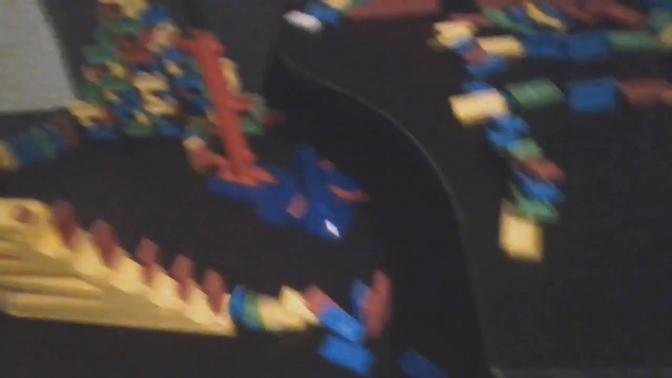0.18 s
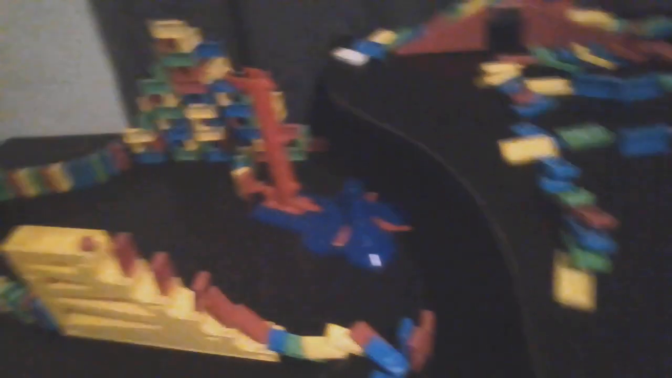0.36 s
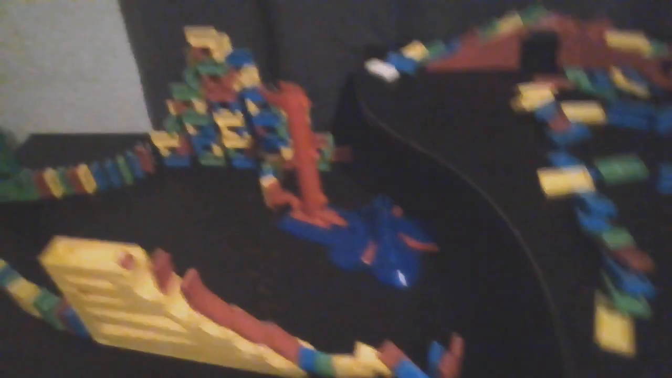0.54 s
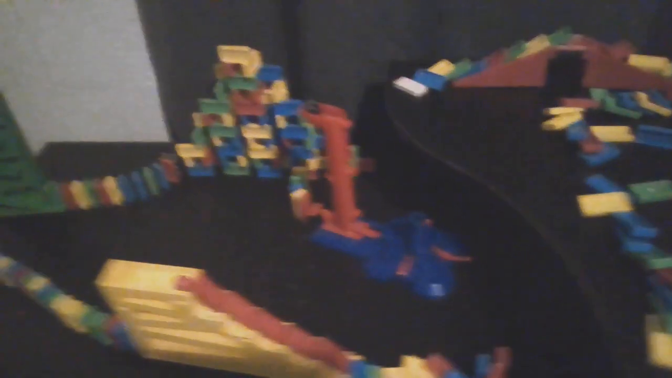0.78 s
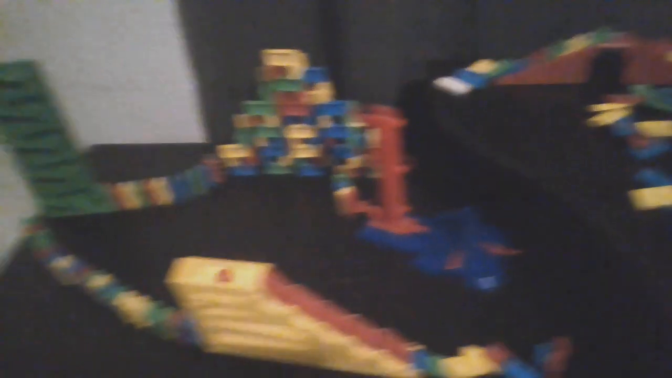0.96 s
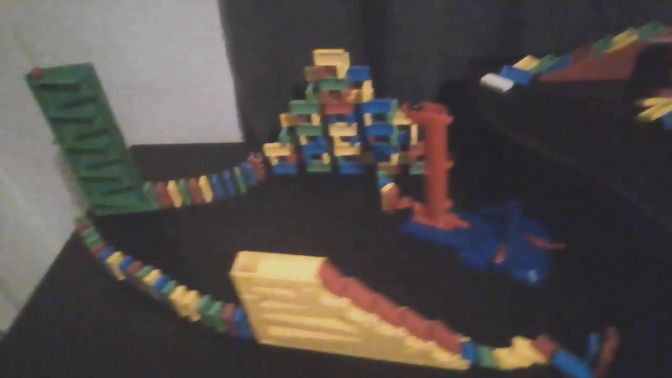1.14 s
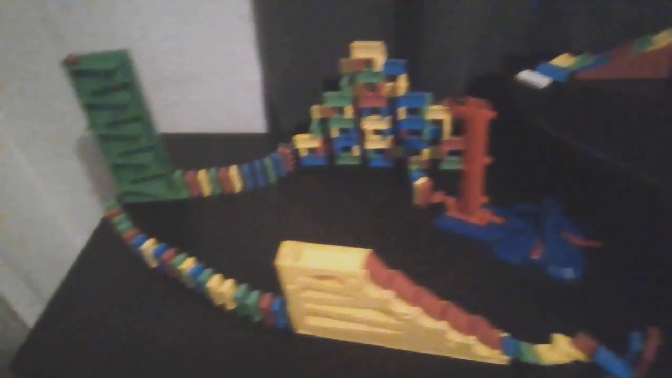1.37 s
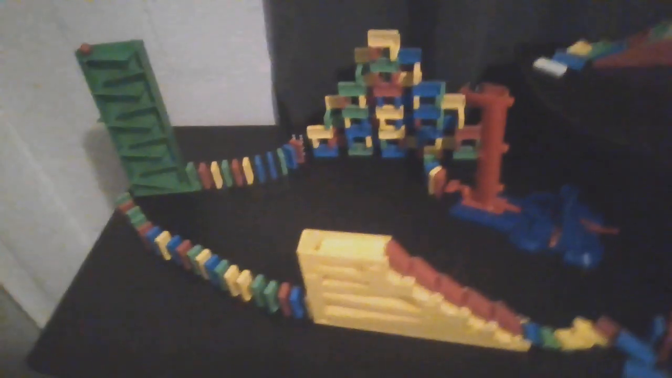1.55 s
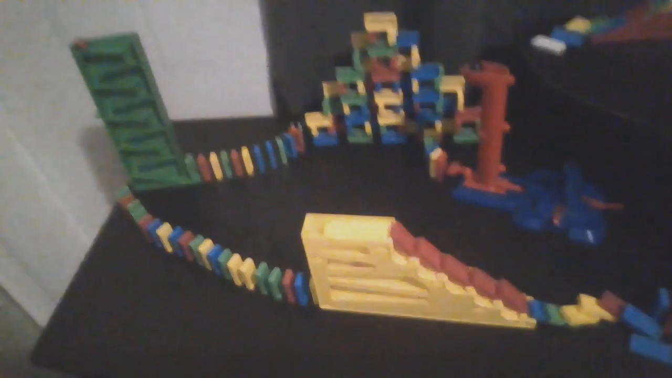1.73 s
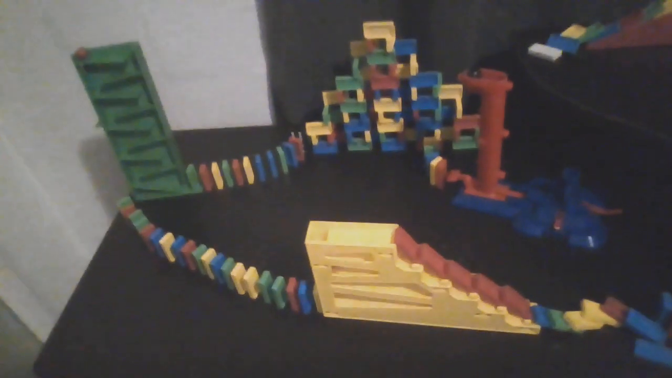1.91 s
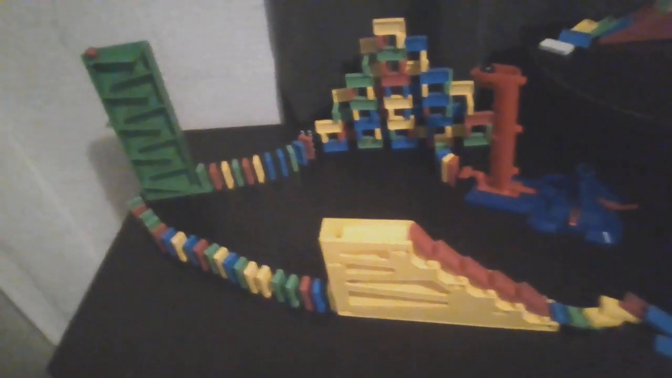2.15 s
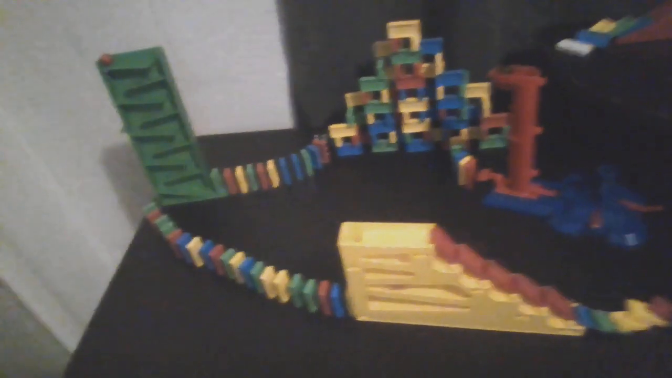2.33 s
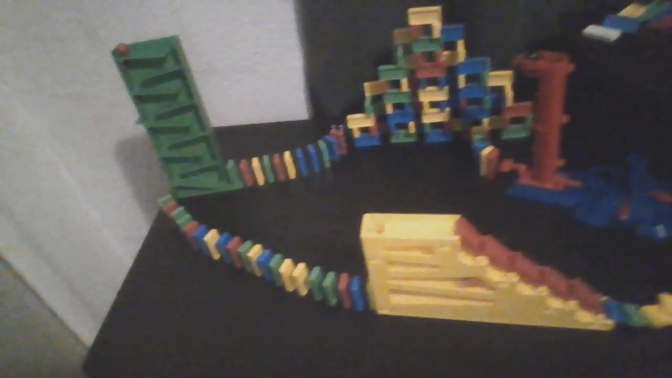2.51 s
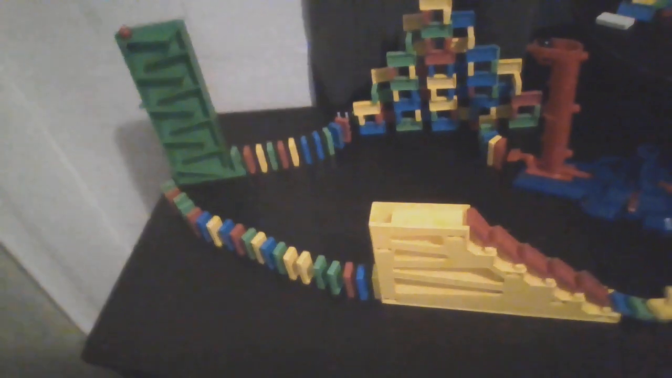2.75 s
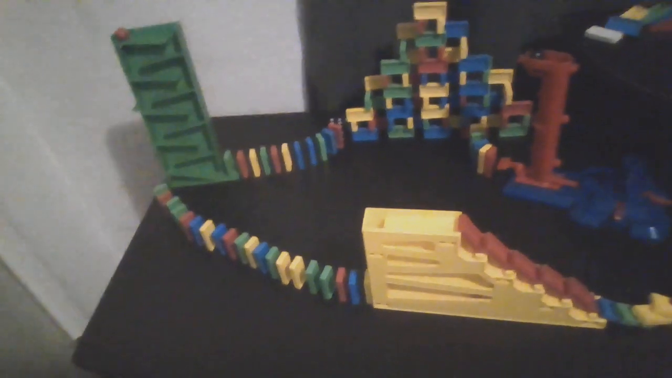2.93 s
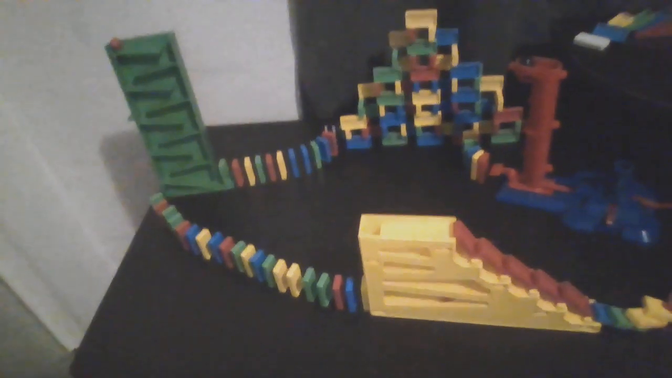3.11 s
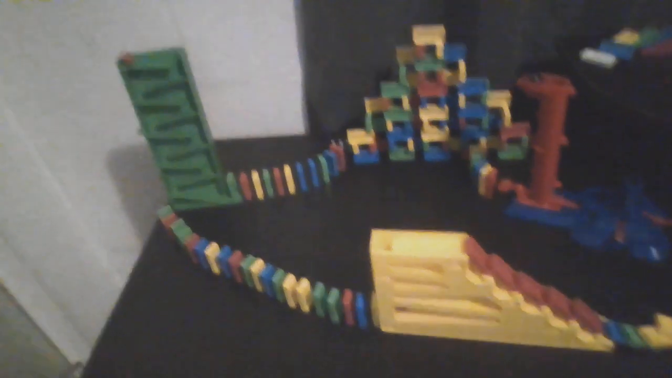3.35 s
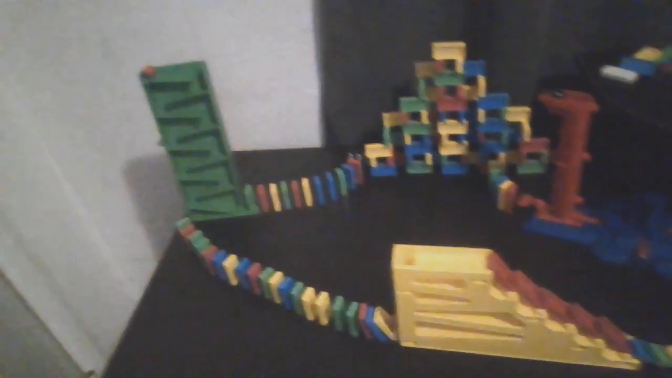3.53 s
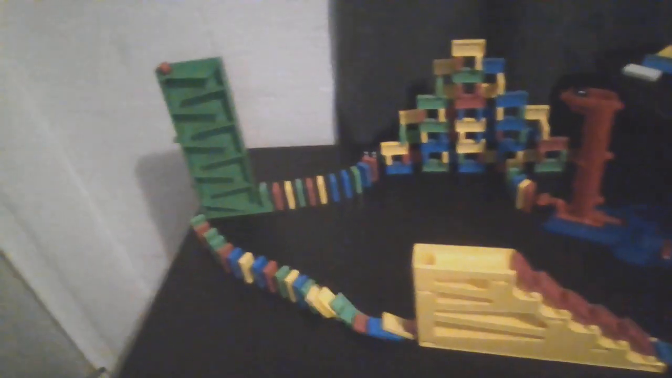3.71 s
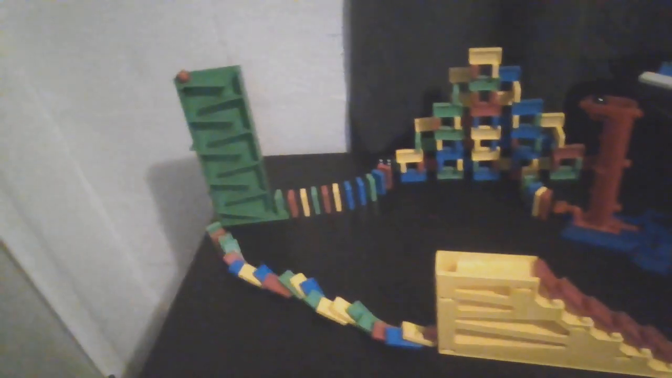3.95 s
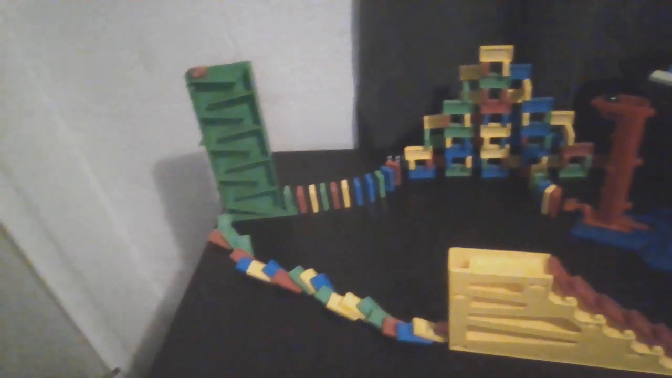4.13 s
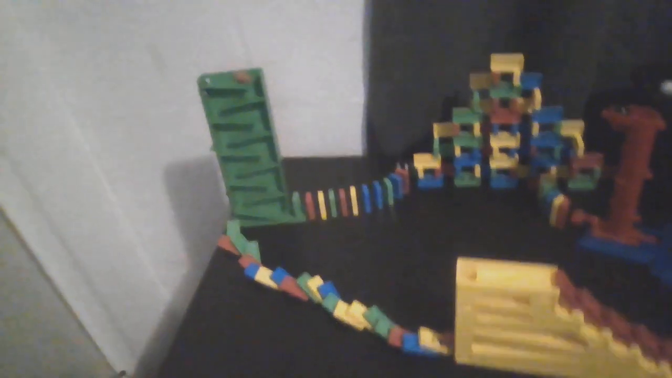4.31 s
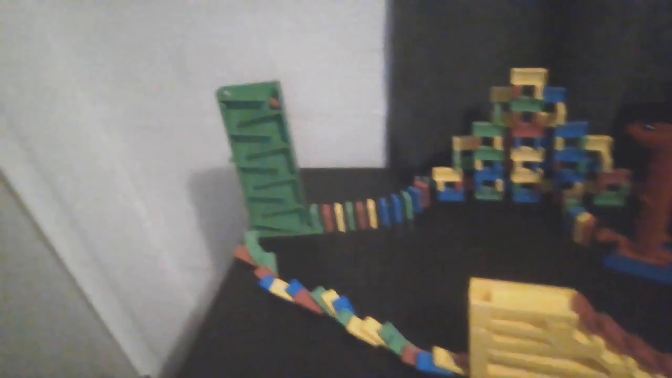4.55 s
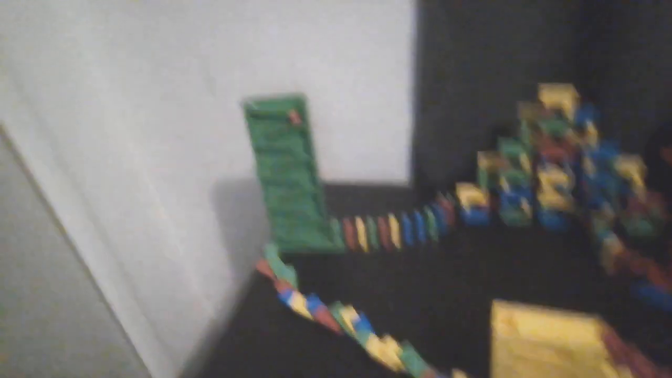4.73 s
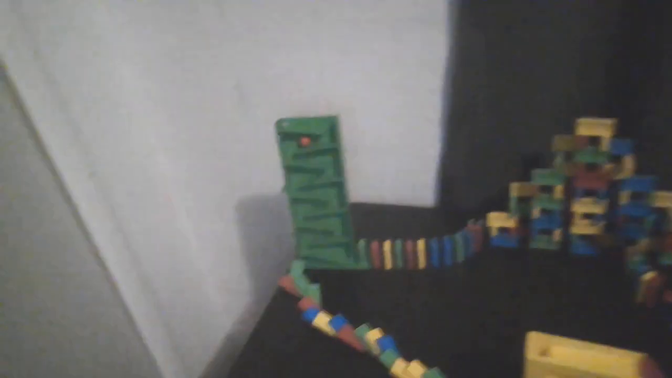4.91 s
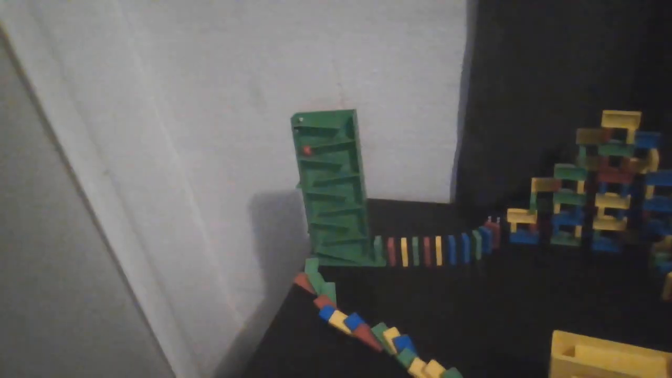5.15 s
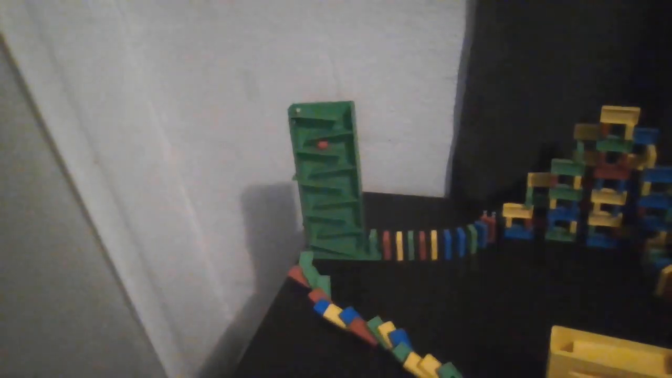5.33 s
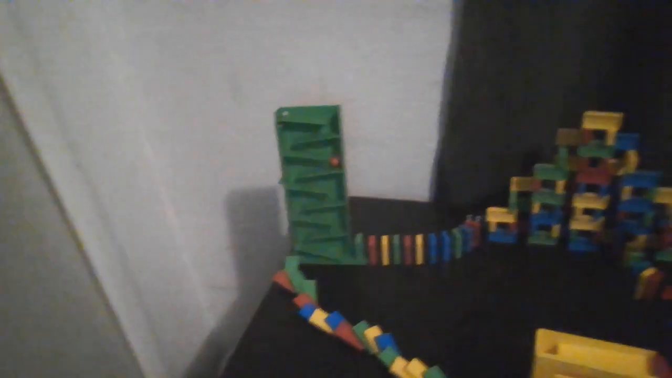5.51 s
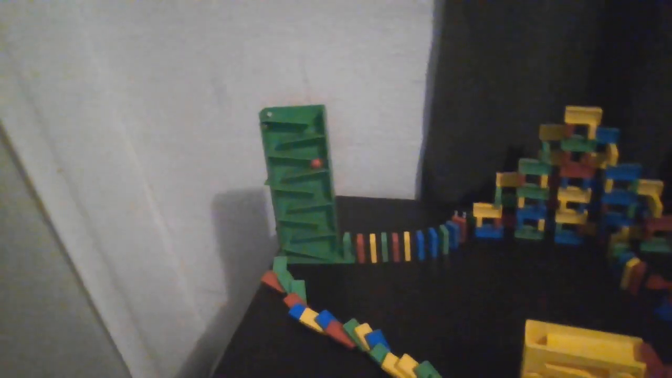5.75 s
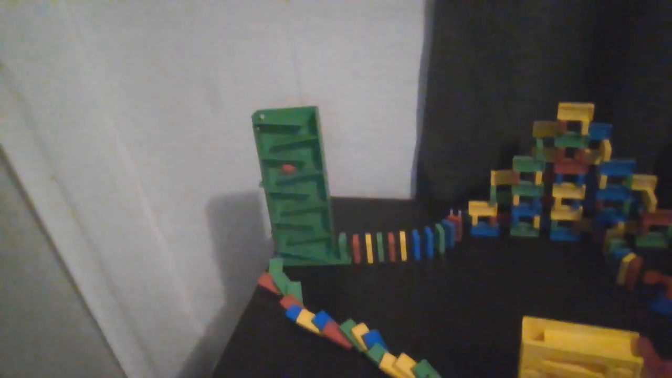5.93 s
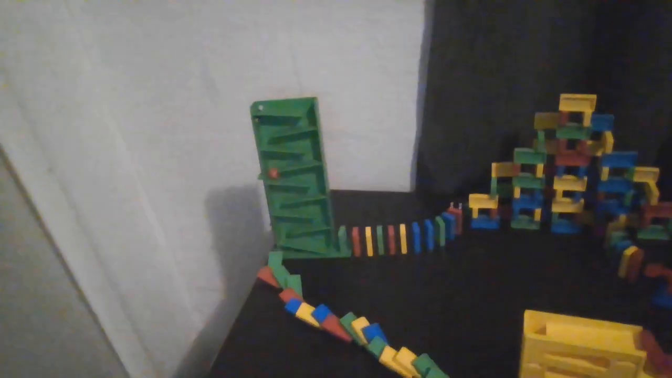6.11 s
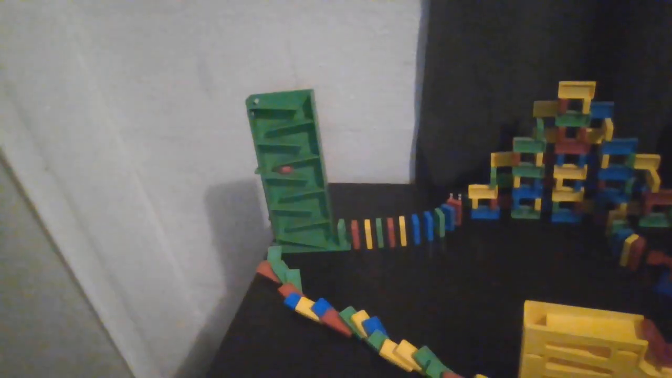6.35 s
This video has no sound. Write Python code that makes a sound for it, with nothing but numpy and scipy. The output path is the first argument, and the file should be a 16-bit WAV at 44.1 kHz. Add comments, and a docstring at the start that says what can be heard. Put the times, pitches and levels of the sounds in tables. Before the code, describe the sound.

Plastic dominoes clatter down in quick runs while a marble rolls and bounces down a hollow plastic staircase, then a tower, with low handling bumps.

```python
"""Plastic dominoes topple in two rattling chains; a marble rolls and drops, bouncing, through a hollow plastic
staircase and later down the ramps of a plastic tower, while the hand-held camera rumbles and thuds.
Tiles are short bending modes over a noisy clack; blows of the marble ring the modes of the hollow bodies.
Rolling is random grit driving those modes; thuds are pressure dips with a low shell ring, over deep noise.
A short room of feedback delays and steady hiss complete the scene."""
import sys
import numpy as np
from scipy import signal
from scipy.fft import rfft, irfft, next_fast_len
from scipy.io import wavfile

SR = 44100
rng = np.random.default_rng(int(sys.argv[2]) if len(sys.argv) > 2 else 0)


def store_wav(level_fs):
    """Save 16-bit WAV to argv[1]."""
    pcm = np.round(np.clip(np.atleast_2d(level_fs), -1, 1) * 32767)
    wavfile.write(sys.argv[1], SR, pcm.T.astype(np.int16))


def nominal_scale(level):
    """Amplitude ratio for a level in decibels (scalar or array-like)."""
    x = np.asarray(level, float) / 20
    return 10 ** x


N = 285768
TOWER_FROM_S = 4.1   # marble sounds from here on belong to the tower

# tiles toppling one by one onto the hollow staircase:
# (time [s], level [dB], nominal first mode [Hz], nominal clack level [dB])
STEP_TILES = [(0.2331, -7, 5050, -12), (0.2866, -14, 5140, -21.5), (0.406, -20, 5140, -21),
              (0.5363, -7.5, 5110, -15.5), (0.6537, -8.5, 5150, -14.5), (0.7735, -10.5, 5280, -19),
              (0.826, -22, 5130, -20)]
# the marble rolls, gathering speed up to an edge:
# (start [s], edge [s], start level [dB], edge level [dB], frequency favoured at speed [Hz])
ROLLS = [(0.942, 1.143, -41, -38, 2276), (1.362, 1.533, -51.5, -42, 2920), (1.737, 1.964, -61, -45, 2900),
         (2.24, 2.642, -50.5, -40, 3490), (2.95, 3.447, -59.5, -35, 2330), (4.235, 4.369, -35, -43, 2230),
         (4.749, 5.013, -59, -46.5, 2450), (5.24, 5.49, -51, -47.5, 2450), (5.73, 6.038, -59, -46.5, 1551),
         (6.284, 6.484, -61, -43, 2400)]
# spectrum of the rolling contact, mostly low; staircase, then tower: (frequency [Hz], level [dB])
ROLL_COLOUR = [
    [(400, -4), (1500, -2), (3500, -1.5), (5000, -12.5), (7000, -36.5)],
    [(400, -1.5), (1500, 6), (2600, 0), (5000, -14), (7000, -36.5)],
]
# what slow rolling favours: (staircase [Hz], tower [Hz])
SLOW_ROLL_HZ = (1380, 1180)


def rms_one(x):
    """Scales to rms 1."""
    return x / np.sqrt(np.mean(x ** 2) + 1e-20)


def level(rows):
    """A (time [s], level [dB]) curve as gain per sample, practically silent outside its span."""
    s, db = np.transpose(rows)[:2]
    return nominal_scale(np.interp(np.arange(N) / SR, s, db, left=-120, right=-120))


def colour(x, points):
    """Filters x by the gain curve of (frequency [Hz], level [dB]) points."""
    hz = np.maximum(np.arange(len(x) // 2 + 1) * SR / len(x), 1)
    curve_hz, curve_db = np.transpose(points)
    gain_db = np.interp(np.log(hz), np.log(curve_hz), curve_db, left=-90)
    return irfft(rfft(x) * nominal_scale(gain_db), len(x))


def ring(clicks, hz, t60):
    """A resonator: a unit click sets a decaying sine of height 1 ringing."""
    r = nominal_scale(-60 / (t60 * SR))
    w = 2 * np.pi * hz / SR
    return signal.lfilter([0, np.sin(w)], [1, -2 * r * np.cos(w), r * r], clicks + 1e-18)


def grains(per_s, spread_db):
    """Tiny contacts: random clicks of uneven size and sign."""
    sizes = nominal_scale(spread_db * np.minimum(rng.exponential(1, N), 4)) * rng.choice([-1, 1], N)
    return sizes * (rng.random(N) < per_s / SR)


def drift(hz):
    """Slow random wandering of rms 1: noise through a two-pole lowpass."""
    r = np.exp(-2 * np.pi * hz / SR)
    return rms_one(signal.lfilter([1], [1, -2 * r, r * r], rng.standard_normal(N)))


def add(out, s, sound):
    """Mixes a sound in at time s."""
    i = round(s * SR)
    out[i:i + len(sound)] += sound[:N - i]


def burst(spectrum, t60, tilt_db, seeds):
    """The countless unresolved modes of a blow: noise that dies away, the treble first."""
    t = np.arange(len(seeds)) / SR
    tilted = [(hz, db + tilt_db * np.log2(hz / 3000)) for hz, db in spectrum]
    # chatter: the contact breaks and remakes
    chatter = nominal_scale(1.35 * rms_one(signal.lfilter([1], [1, -.99], seeds[::-1])))
    shaped = rms_one(colour(seeds, tilted)) * chatter
    low = signal.lfilter([.35], [1, -.65], shaped)
    treble = shaped - low
    return (low * nominal_scale(-60 * t / t60) + treble * nominal_scale(-60 * t / (0.49 * t60))) / 2


def tiles():
    """Every tile rings its own slightly scaled bending modes over a clack; sliding chains rattle and scuff."""
    # tile on tile, the blows that stand out of the rattle: (time [s], level [dB])
    tile_hits = [(0.0004, -5), (0.0134, -6), (0.0514, 0.5), (0.0598, -1.5), (0.0734, -1), (0.1011, -16),
                 (0.1224, -10), (0.162, -8.5), (0.1849, -15), (0.647, -30), (3.4715, -14.5),
                 (3.5004, -14.5), (3.5508, -26.5), (3.5934, -15), (3.6072, -11.5), (3.6469, -9.5),
                 (3.6697, -8.5), (3.6885, -3), (3.712, -4.5), (3.7334, -1), (3.7594, -3.5), (3.778, -8.5),
                 (3.8037, -2), (3.8322, -8), (3.8544, -10), (3.8791, -7.5), (3.904, -0.5), (3.9504, -6),
                 (3.9717, -2), (3.9894, -1.5), (4.006, -3.5), (4.0455, -2.5), (4.0844, -2.5)]
    # small slips and taps, one curve for each running chain: (time [s], level [dB])
    rattle_runs = [
        [(0.0, -21), (0.11, -49), (0.3, -33)],
        [(3.585, -33.5), (3.915, -14.5), (4.2, -37)],
    ]
    # a tile's bending modes: (multiple of first mode, level [dB], t60 [s])
    tile_modes = [(1.001, 3.5, 0.038), (1.041, -13, 0.13), (1.499, -13.5, 0.057), (1.585, -18, 0.045),
                  (2.089, -5.5, 0.022), (2.152, -27.5, 0.021), (3.081, -20.5, .03)]
    # spectrum of the broad clack of tile on table: (frequency [Hz], level [dB])
    clack_spectrum = [(300, -5), (700, -2), (1300, -2), (3300, 2), (6000, -1), (9000, -19.5),
                      (13000, -15.5), (16000, -12.5)]
    out, t = np.zeros(N), np.arange(6000) / SR
    # chain tiles fall from the same height, so the clack on the table hardly follows the blow
    chain = [(s, db, 4996, -15.5 + 0.38 * db) for s, db in tile_hits]
    hits = chain + STEP_TILES
    chance = rng.standard_normal((len(hits), 6000))
    for (s, db, hz, clack_db), seeds in zip(hits, chance):
        clack_db = clack_db + 1 * seeds[-2]   # spread 1 dB
        hz = hz * (1 + .009 * seeds[-1])
        rings = sum(nominal_scale(mode_db + 1.5 * seeds[k] - 60 * t / t60) * np.sin(2 * np.pi * hz * ratio * t)
                    for k, (ratio, mode_db, t60) in enumerate(tile_modes))
        swell = 1 - np.exp(-t / 0.00057)   # faces slap together over a millisecond or so
        crack = np.diff(seeds, prepend=0) * nominal_scale(-60 * t / 0.0035)   # edges meet first
        clack = nominal_scale(clack_db) * burst(clack_spectrum, 0.15, 0, seeds)
        add(out, s, nominal_scale(db - 4.0) * rings * swell + clack + nominal_scale(db - 15.0) * crack)
    taps = grains(1500, spread_db=4.0)
    tapped_tile = rng.integers(0, 6, N)   # each tap falls on one of six tile pitches
    rattle = sum(nominal_scale(mode_db) * ring(taps * (tapped_tile == k), hz * ratio, t60)
                 for k, hz in enumerate(np.linspace(4850, 5250, num=6))
                 for ratio, mode_db, t60 in tile_modes)
    scuff = colour(grains(1500, spread_db=6.0), clack_spectrum)
    running = sum(level(run) for run in rattle_runs)
    return out + running * (rms_one(rattle) + nominal_scale(-12.5) * rms_one(scuff))


def handling():
    """Each thud is a short pressure dip that leaves the camera shell ringing low; the sway is lumpy deep noise."""
    # fingers shifting on the camera body: (start [s], level [dB])
    thuds = [(0.346, -16.5), (0.445, -18), (0.72, -30), (0.945, -38), (1.083, -26), (1.283, -26.5),
             (1.518, -24), (1.718, -25.5), (1.869, -27.5), (1.912, -25), (2.318, -24.5), (2.414, -25),
             (2.471, -25), (2.637, -22.5), (2.793, -25.5), (3.244, -19.5), (3.544, -16), (4.154, -21),
             (4.263, -24), (4.676, -29.5), (4.79, -24.5), (4.82, -24.5), (4.895, -21), (4.949, -28.5),
             (5.166, -27), (5.311, -23.5), (5.338, -22.5), (5.415, -21), (5.821, -27)]
    # the hand's slow sway on the camera: (time [s], level [dB])
    sway_curve = [(0.0, -36), (0.49, -19.5), (2.27, -34.5), (2.33, -29), (2.89, -33), (3.59, -28),
                  (3.86, -34), (4.96, -31.5), (5.07, -34), (5.31, -24.5), (6.35, -39), (6.48, -38.5)]
    # spectrum of the sway: (frequency [Hz], level [dB])
    sway_spectrum = [(15, 20), (30, -12), (60, -5), (120, -18), (250, -19), (500, -42), (1000, -67.5)]
    out, t = np.zeros(N), np.arange(3000) / SR
    since = t - .008   # the dip is deepest 8 ms after the start
    chance = rng.uniform(-1.24, 1, (len(thuds), 2))
    for (s, db), (size, shell) in zip(thuds, chance):
        dip = np.exp(-(since / (0.0013 * 2 ** (0.42 * size))) ** 2)
        hz = 220 * 2 ** (0.45 * shell)
        wobble = np.sin(2 * np.pi * hz * (since - .001)) * nominal_scale(-60 * since / 0.059) * (since > .001)
        creak = np.sin(2 * np.pi * 1.845 * hz * since) * np.exp(-(since / 0.0057) ** 2)
        add(out, s, nominal_scale(db + 5.5) * (0.33 * wobble + 0.11 * creak - dip))
    slow_noise = signal.lfilter([1], [1, -np.exp(-2 * np.pi * 6.3 / SR)], rng.standard_normal(N))
    lumps = nominal_scale(4.43 * rms_one(slow_noise))
    deep_noise = colour(rng.standard_normal(N), sway_spectrum)
    return out + level(sway_curve) * rms_one(lumps * deep_noise)


def hiss():
    """The microphone's steady white noise."""
    return nominal_scale(-60.5) * rng.standard_normal(N)


def blows(start_s, end_s, bounce, count):
    """Knocks, landings and each landing's shrinking hops within a time span, for one body."""
    # the marble knocks once against a wall or seam:
    # (time [s], level [dB], frequency the struck spot favours [Hz], relative level of hollow low modes [dB])
    knocks = [(1.1653, 1, 3390, -1), (1.1754, 2, 2050, -23.5), (1.5834, 3.5, 3605, 1),
              (1.77, -36.5, 2880, 1), (1.8493, -23.5, 2900, -5.5), (1.9897, 1, 5050, -11.5),
              (2.37, -29, 3420, -8), (2.415, -21, 2890, -24), (2.475, -24.5, 2880, -32.5),
              (2.6759, 7, 3450, 2), (3.2176, -23, 3350, -1), (3.042, -34, 2460, 0),
              (3.108, -29, 3490, -5.5), (4.138, -5.5, 2200, -19), (4.1649, -10, 2200, -11),
              (4.4015, 4.5, 3600, 0), (5.0478, -3.5, 2200, -12), (4.995, -32.5, 2450, -5.5),
              (5.385, -30, 2450, -16.5), (5.472, -17.5, 2460, -8), (5.5186, -0.5, 2400, -7),
              (6.0665, 0.5, 2467, -8.5), (6.435, -21, 2410, -6)]
    # the marble lands on the next step or ramp and bounces:
    # (time [s], level [dB], favoured frequency [Hz], relative hollow level [dB], first hop [s])
    landings = [(1.1972, 5.5, 3490, -33, 0.052), (1.6084, 3, 2920, 3, 0.028),
                (2.0153, 5, 2832, -3.5, 0.046), (2.7121, 5, 2380, -13.5, 0.039),
                (4.431, 3, 2400, -16.5, 0.037), (5.0705, 5.5, 2410, -13.5, 0.039),
                (5.5434, 6.5, 3960, -19.5, 0.038), (6.0907, 5.5, 2520, -20, 0.034)]
    second, share, rebound_db, hop_db, hollow_db = bounce
    rows = list(knocks) + [row[:4] for row in landings]
    for s, db, hz, _, hop_s in landings:
        for k in range(count):
            hop_share = second * share ** (k - 1) if k else 1
            s = s + hop_s * hop_share
            rows.append((s, db - rebound_db - hop_db * k, hz, hollow_db))
    return [row for row in rows if start_s <= row[0] < end_s]


def strike_body(hits, modes, tick_db, hard_db):
    """Blows on a hollow body ring the modes near the struck spot most, hard ones more brightly."""
    # spectrum of the broad tick of glass on plastic, before its tilt: (frequency [Hz], level [dB])
    tick_spectrum = [(300, 4), (700, -13.5), (1500, 3.5), (3500, 1.5), (6000, -4.5), (8000, -16.5),
                     (12000, -13), (16000, -28)]
    out, t = np.zeros(N), np.arange(9000) / SR
    hz, mode_db, t60 = np.transpose(modes)[:, :, None]
    # uneven walls split each mode into a beating pair
    twin_hz = hz * (1 + 0.013 * rng.uniform(0.19, 1.5, hz.shape))
    pairs = np.sin(2 * np.pi * hz * t) + 0.32 * np.sin(2 * np.pi * twin_hz * t)
    decays = nominal_scale(-60 * t / t60) * pairs
    chance = rng.standard_normal((len(hits), 9000))
    for (s, db, spot_hz, hollow_db), seeds in zip(hits, chance):
        tilt_db = hard_db + 0.21 * db   # per octave: soft contacts last longer, so sound duller
        near_db = 12 * np.exp(-(np.log2(hz / spot_hz) / .06) ** 2)
        scatter_db = 3 * seeds[:len(hz), None]
        gains = nominal_scale(mode_db + near_db + tilt_db * np.log2(hz / 3000) + scatter_db)
        gains = gains * np.sign(seeds[-len(hz):, None]) / np.sqrt(np.sum(gains ** 2))
        gains = gains * nominal_scale((hollow_db + 12) * (hz < 1800) * (hz > 900))   # hollow low modes
        tick = nominal_scale(db + tick_db) * burst(tick_spectrum, 0.093, tilt_db, seeds)
        add(out, s, nominal_scale(db - 9.5) * np.sum(gains * decays, axis=0) + tick)
    return out


def rolling(rows, modes, roll_colour, slow_hz):
    """Surface bumps tickle every mode; the favoured one moves from a low mode to the panel's own with speed."""
    # the rolling marble grinds over a ridge: (time [s], level change [dB])
    ridge_rows = [(1.08, 6), (1.529, 7.5), (1.938, 14.5), (2.39, -2.5), (2.515, 12), (2.588, 10.5),
                  (3.06, 5), (3.12, 11), (3.23, 6), (3.314, 14.5), (3.42, 1.5), (4.36, 7), (4.88, 4),
                  (5.005, 7), (5.39, 3), (5.92, 8), (6.023, 6.5), (6.45, 5.5)]
    fade_s = 0.017   # contact is made, and lost at the edge
    lumps_hz = 20
    t = np.arange(N) / SR
    grit = grains(1500, spread_db=4.0)
    lumps = nominal_scale(3.5 * drift(lumps_hz))   # uneven floor, spread 3.5 dB
    gain, speed, spot_hz = np.zeros(N), np.zeros(N), np.full(N, 1.0 * slow_hz)
    for start, edge, start_db, edge_db, hz in rows:
        here = (t >= start - fade_s) & (t < edge + fade_s)
        speed[here] = np.clip((t[here] - start) / (edge - start), 0, 1)
        spot_hz[here] = hz
        inside_s = np.minimum(t[here] - start, edge - t[here])
        contact = np.clip(inside_s / fade_s + 1, 0, 1) ** 2
        gain[here] = contact * nominal_scale(start_db + (edge_db - start_db) * speed[here])
    ridges = nominal_scale(sum(db * np.exp(-((t - s) / 0.012) ** 2) for s, db in ridge_rows))
    bumps = gain * lumps * ridges * rms_one(colour(grit, roll_colour))
    body = 0
    for hz, db, t60 in modes:
        slow, fast = (nominal_scale(9.65 * np.exp(-(np.log2(hz / f) / 0.028) ** 2)) for f in (slow_hz, spot_hz))
        favour = slow + (fast - slow) * speed
        dull_db = -6.5 * (1 - speed) * np.log2(hz / slow_hz)   # 6.5 dB per octave at a standstill
        # each mode swells and fades on its own as the marble moves on
        shift_db = 4.5 * drift(lumps_hz / 2)
        drive = bumps * favour * nominal_scale(dull_db + shift_db)
        # the marble's contact evens out the modes and damps them
        body = body + nominal_scale(0.4 * db) * ring(drive, hz, 0.42 * t60) / np.sqrt(t60)
    return nominal_scale(-46.5) * body


def staircase():
    """The hollow staircase answers falling tiles, then rings under the marble's blows and rolling."""
    # modes of the staircase when struck: (frequency [Hz], level [dB], t60 [s])
    stair_modes = [(588, -15, 0.11), (1034, -26, 0.22), (1404, -13.5, 0.047), (1653, -19.5, 0.072),
                   (2048, -13, 0.066), (2306, -7, 0.081), (2460, -12, 0.053), (2896, -2, 0.091),
                   (3345, -7.5, 0.12), (3490, 2, 0.053), (3600, -8.5, 0.13), (3820, -40, 0.11),
                   (4196, -23.5, .08), (4800, -6, 0.081), (5050, -7, 0.059), (5350, -9, 0.11),
                   (7660, -11.5, .06)]
    # bouncing on a step: (second hop's share of the first, each later hop's share of the last,
    # loss at first rebound [dB], loss per later hop [dB], relative hollow level [dB])
    stair_bounce = (0.61, 0.68, 8.5, 10, -29)
    # the answer to each tile: 3 dB over its nominal clack, favouring 3390 Hz
    answers = [(s, clack_db + 3, 3390, -9) for s, _, _, clack_db in STEP_TILES]
    hits = answers + blows(0, TOWER_FROM_S, stair_bounce, count=3)
    struck = strike_body(hits, stair_modes, tick_db=-10.5, hard_db=1.35)
    rolls = [row for row in ROLLS if row[0] < TOWER_FROM_S]
    return struck + rolling(rolls, stair_modes, ROLL_COLOUR[0], SLOW_ROLL_HZ[0])


def tower():
    """The plastic tower's modes ring as the marble knocks, bounces and rolls down its ramps."""
    # modes of the tower when struck: (frequency [Hz], level [dB], t60 [s])
    tower_modes = [(679, -12.5, 0.051), (1045, -19, 0.3), (1210, -10.5, 0.12), (1393, -5, 0.048),
                   (1534, -11.5, 0.106), (1850, -26, 0.12), (2200, -9.5, 0.17), (2400, -14.5, 0.17),
                   (2450, -2.5, 0.07), (3205, -11.5, 0.083), (3610, -4, 0.056), (4010, -13.5, 0.069),
                   (4530, -6.5, 0.048), (4285, -1, 0.059), (4980, -7, 0.027), (5580, -12, 0.041),
                   (6670, -30, 0.05), (10800, -18, 0.025), (12560, -26.5, 0.03), (15400, -25, 0.022)]
    # bouncing on a ramp: (second hop's share of the first, each later hop's share of the last,
    # loss at first rebound [dB], loss per later hop [dB], relative hollow level [dB])
    tower_bounce = (0.9142, 0.74, 11, 3.5, -17.5)
    hits = blows(TOWER_FROM_S, N / SR, tower_bounce, count=6)
    struck = strike_body(hits, tower_modes, tick_db=-12.0, hard_db=2.0)
    rolls = [row for row in ROLLS if row[0] >= TOWER_FROM_S]
    return struck + rolling(rolls, tower_modes, ROLL_COLOUR[1], SLOW_ROLL_HZ[1])


def room(x):
    """Ten feedback delays of 6 to 33 ms, duller on every round, make the room's echoes."""
    t60_s, wall_cut_hz = 0.21, 12000   # decay of the lows; lowpass on each round
    size = next_fast_len(N + SR)
    w = 2 * np.pi * np.arange(size // 2 + 1) / size
    dull = 1 / (1 + 1j * w * SR / (2 * np.pi * wall_cut_hz))
    echoes = 0
    for k, lag in enumerate(rng.uniform(.006, 0.033, size=10) * SR):
        loop = nominal_scale(-60 * lag / SR / t60_s) * dull * np.exp(-1j * w * lag)
        echoes = echoes + (-1) ** k * loop / (1 - loop)
    return irfft(rfft(x, size) * echoes, size)[:N]


def scene():
    """Table-top sounds with their room, the hand on the camera, and the microphone's hiss."""
    table = tiles() + staircase() + tower()
    return (table + nominal_scale(-17.5) * room(table) + handling() + hiss())[None]


def roll_off(x):
    """The treble ends steeply here."""
    return signal.sosfilt(signal.butter(12, 16460, fs=SR, output="sos"), x)


def record(dry):
    """The loudest peaks are rounded off at full scale, then a steep lowpass cuts the top."""
    rounded = dry / (1 + np.abs(dry) ** 6) ** (1 / 6)
    lowpass = signal.cheby2(12, 45, 16500, fs=SR, output="sos")   # 45 dB down from 16.5 kHz
    finished = signal.sosfilt(lowpass, rounded)
    return roll_off(finished)


dry = scene()
out = record(dry)
store_wav(out)
```